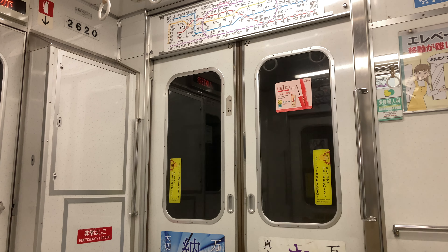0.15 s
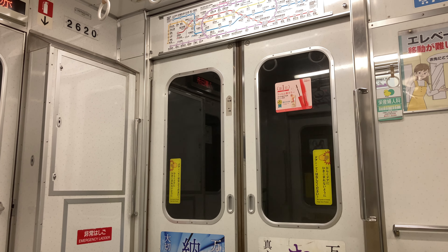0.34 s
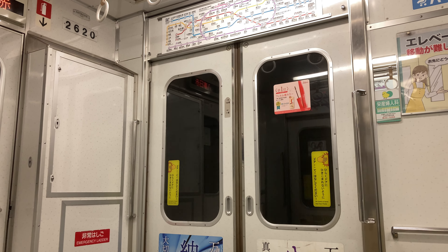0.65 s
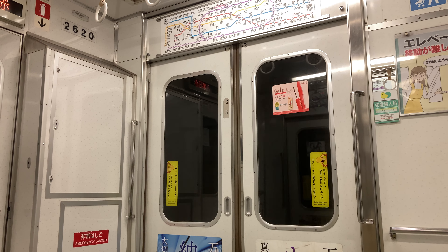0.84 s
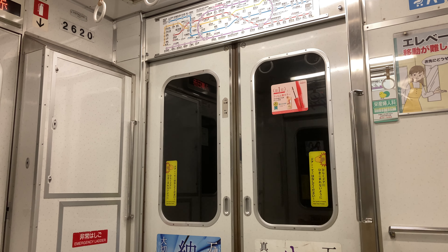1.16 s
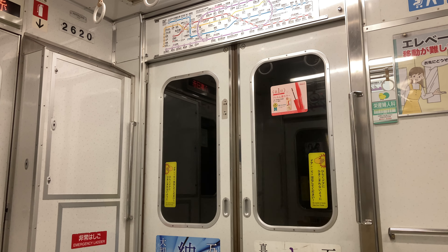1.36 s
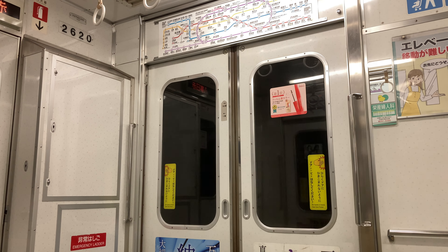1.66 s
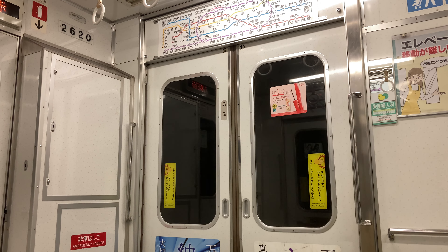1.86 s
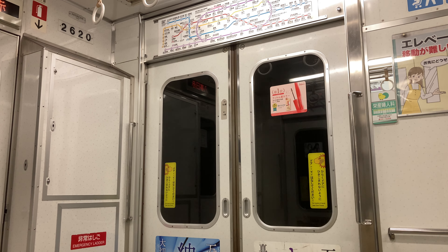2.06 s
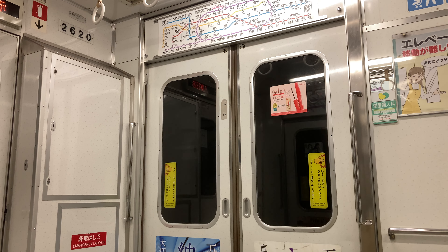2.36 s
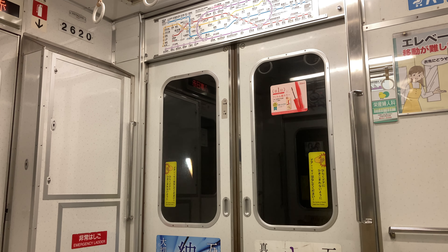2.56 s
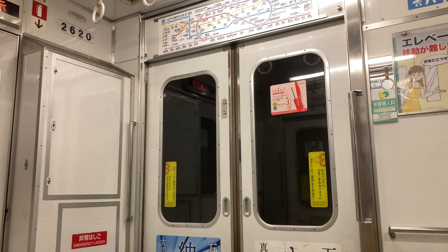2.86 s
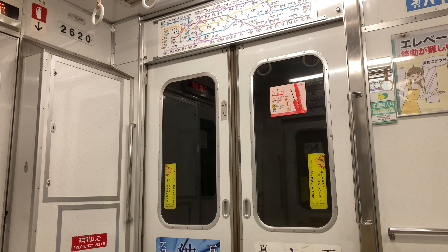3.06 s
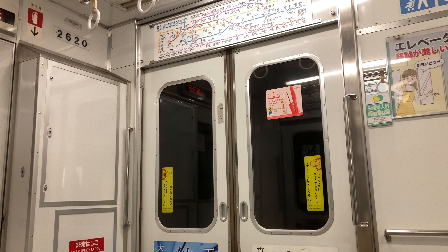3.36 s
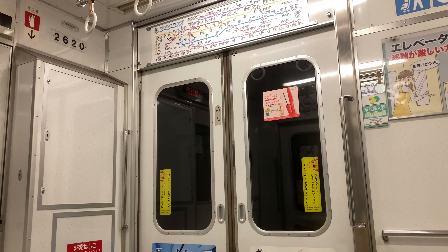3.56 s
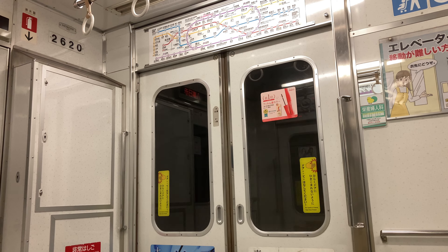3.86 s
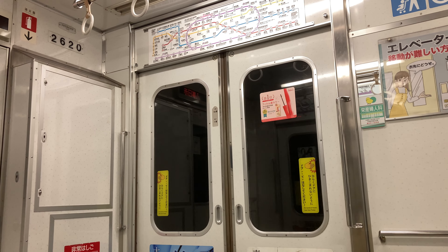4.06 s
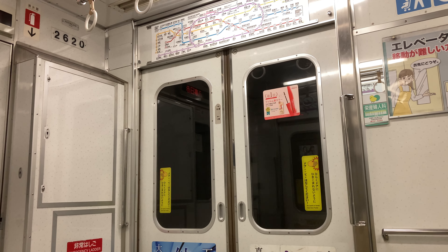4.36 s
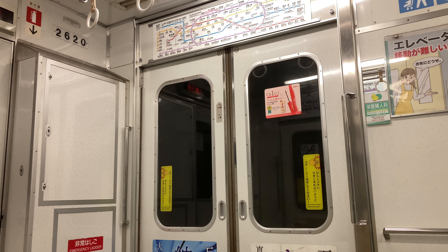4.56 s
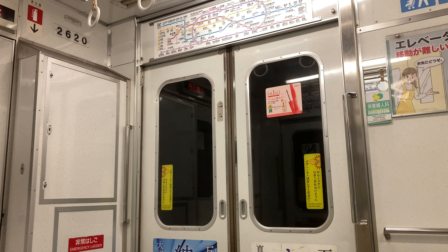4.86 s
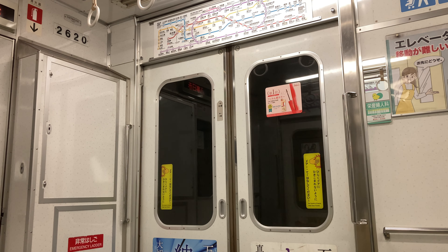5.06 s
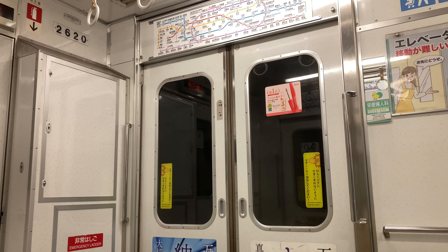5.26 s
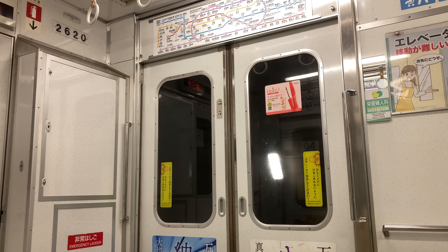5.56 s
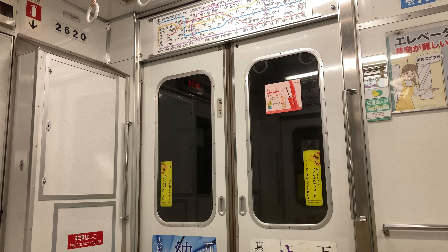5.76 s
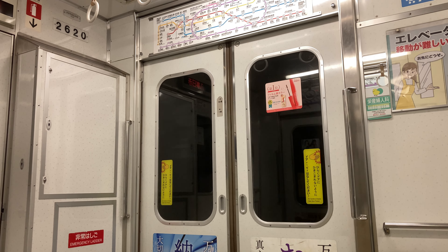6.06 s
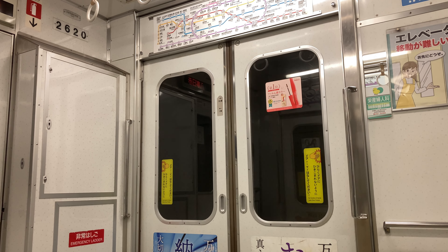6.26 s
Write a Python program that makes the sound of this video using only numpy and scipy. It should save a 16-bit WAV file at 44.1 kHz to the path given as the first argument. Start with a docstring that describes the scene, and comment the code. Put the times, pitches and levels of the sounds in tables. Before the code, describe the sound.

A subway train rolls through a tunnel, heard from a handheld microphone by the doors. A continuous low rumble fills the car, with faint ringing from the rails and a light rattle of panels. Clusters of dull thuds pass underfoot at rail joints. Very high, wavering wheel squeals sound on and off for the first four seconds or so. Later comes one small metallic clink, and the rumble grows slightly duller.

```python
"""Inside a metro car, rolling through a tunnel and slowing a little, heard from a handheld microphone pair.
All around, the wheels rumble through floor and doors; underfoot, axles thud over rail joints in pairs.
Flanges stick and slip on the rail and squeal very high, rail and wheel resonances sing, doors and panels
rattle, and a small metal part clinks once. Rumble and thuds reach the two microphone ports from all sides;
squeals and clink arrive straight from one spot."""
import sys
import numpy as np
from scipy import signal
from scipy.fft import rfft, irfft
from scipy.io import wavfile

SR = 44100
rng = np.random.default_rng(int(sys.argv[2]) if len(sys.argv) > 2 else 0)


def unload_wav(signal):
    """Save mono or channel-first audio to the path in sys.argv[1] as 16-bit WAV at rate SR, clipped to [-1, 1]."""
    wavfile.write(
        sys.argv[1],
        SR,
        np.round(np.clip(np.atleast_2d(signal).T, -1, 1) * 32767).astype(np.int16),
    )


N = 283122
TIME = np.arange(N) / SR
PROGRESS = TIME / TIME[-1] - .5   # -0.5 at the start, +0.5 at the end
HZ = np.maximum(np.arange(N // 2 + 1) * SR / N, 1)


# the ride, from inside the car: (time [s], rumble [dB], tunnel hiss [dB], roar lift [dB], singing lift [dB])
RIDE_LEVELS = [(0.0, -20.5, -59, 1.5, -4.5), (.6, -22.5, -66, 5, -0.7), (.9, -20.5, -64, 0, -3),
               (1.2, -21, -63, 0.5, -2), (1.6, -21, -64, 2, -0.5), (2.0, -21.5, -62, 1.4, 0.5),
               (2.8, -22, -60, 1, 1.3), (3.1, -21.5, -62, 0, 2), (3.45, -21, -61, 3.5, 3),
               (3.8, -19.5, -58, -2, 2), (4.3, -22, -59.5, -0.4, 3.5), (5.1, -22, -62.5, -0.2, 3.5),
               (5.5, -22, -59.5, 1, 4.5), (6.0, -20.5, -57.5, -0.5, 3.9), (6.42, -19.5, -64, 0.3, 3.5)]
# wheel rumble through floor and doors: (frequency [Hz], relative level [dB])
RUMBLE_SPECTRUM = [(13, -43), (22, -21), (70, -4.5), (119, -1), (197, 1), (270, -7), (437, -7.5),
                   (613, -17), (1090, -28.5), (2370, -29.5), (3920, -44), (4650, -40), (5770, -46.5),
                   (7000, -53.5), (9100, -77), (15400, -120)]
# resonances of the car body around the microphone: (frequency [Hz], width [Hz], lift [dB])
BODY_RESONANCES = [(38, 10, 2), (61, 6.3, 6.5), (83.2, 9, 10.5), (155.5, 35, 4), (208.7, 39.5, 4.5),
                   (238.7, 34.6, 4.5), (295.6, 5.5, 7.5), (321, 53, 2), (747, 9, 6), (1035, 350, 6),
                   (1420, 280, 4.5), (2012, 23, 6.5), (2160, 220, 3), (2730, 220, 3), (2980, 210, 4)]
# hiss from the tunnel outside: (frequency [Hz], relative level [dB])
HISS_SPECTRUM = [(4000, -30), (6500, -2), (7600, -1), (8700, -1), (9100, 2), (9600, -2), (11500, -4),
                 (13500, -6), (15700, -9)]
# effect of losing speed: (frequency [Hz], change from start to end [dB])
SLOWING_CHANGE = [(60, -2.5), (140, 3), (220, -3), (400, -4), (900, -5.5), (1600, -4.5), (2900, -18.5),
                  (5000, 0), (9000, -4.5), (13000, -13.5)]

def rolling():
    """Rough wheels on rail rumble through the car body and the tunnel hisses; duller as speed falls."""
    roar_hz, singing_hz = 420, 2600
    rumble_db, hiss_db, roar_db, singing_db = in_time(RIDE_LEVELS)
    body_db = sum(db / (1 + (2 * (HZ - hz) / width) ** 2) for hz, width, db in BODY_RESONANCES)
    slowing_db, common_drift = over_hz(SLOWING_CHANGE), drift(20)

    def band_db(hz):
        roar_lift_db = roar_db * np.exp(-2 * np.log2(hz / roar_hz) ** 2)
        singing_lift_db = singing_db * np.exp(-2 * np.log2(hz / singing_hz) ** 2)
        treble = 1 / (1 + (900 / hz) ** 4)
        waver_db = .15 * treble * common_drift + (1.4 + .61 * (1 - treble)) * drift(15.5)
        return roar_lift_db + singing_lift_db + PROGRESS * np.interp(hz, HZ, slowing_db) + waver_db

    rumble = in_bands(diffuse(over_hz(RUMBLE_SPECTRUM) + body_db),
                      lambda hz: rumble_db + band_db(hz), 30, 8000)
    hiss = in_bands(diffuse(over_hz(HISS_SPECTRUM)), lambda hz: hiss_db + band_db(hz), 3000, 22000)
    return rumble + hiss


# axles over rail joints, below the floor: (time [s], thud [dB], brightness [dB], thud t60 at 350 Hz [s],
# floor knock [dB], pitch the knock favours [Hz], door clatter [dB])
AXLE_BLOWS = [(0.17, -17.5, -17, 0.97, -26.5, 416, -70), (.305, -17.5, -5.5, 0.68, -22, 222, -45),
              (0.353, -34, 9.5, 0.45, -18, 318, -46), (0.424, -16.5, -25, 0.8, -20.5, 223, -52),
              (0.972, -12, -39, 0.91, -20.5, 194, -70), (1.032, -20.5, -18, 1, -48, 198, -60),
              (1.17, -28, 2, 0.59, -31, 274, -60), (2.181, -22, -3.5, 0.5, -19, 366, -55),
              (2.232, -21, -11, 0.96, -18, 200, -55), (2.335, -18, -7, 1, -17.5, 210, -50),
              (2.421, -25, -11, 0.63, -30.5, 335, -55), (3.105, -26, -1.5, 0.81, -19, 198, -60),
              (3.189, -38, 12, 0.96, -21.5, 223, -55), (4.522, -19.5, -13, 0.97, -17, 396, -58),
              (4.58, -32, -2, 0.44, -23.5, 421, -60), (4.69, -19.5, -7, 0.93, -18, 223, -52),
              (4.782, -36, -8, .45, -28, 418, -58), (5.53, -20, -17, 1, -29, 324, -65),
              (5.741, -23, -11, 0.54, -27, 423, -65)]
# the thud, arriving from all sides: (frequency [Hz], relative level [dB])
THUD_SPECTRUM = [(60, -31), (150, -26), (230, -8.5), (350, 2.5), (520, -7), (760, -4.5), (1100, -16.5),
                 (1450, -11.5), (2000, -21), (4200, -26), (5200, -30.5), (8000, -41.5), (14000, -50)]
# the floor ringing underfoot: (frequency [Hz], level [dB], t60 [s])
FLOOR_RING = [(198, -11, 0.79), (223, -8, 0.58), (274, -7.5, 0.23), (324.4, 2, 0.22), (366, -6, 0.45),
              (419.4, -8.5, 0.36), (478, -11, 0.25), (704, -11, 0.21)]
THUD_SWELL_S = .016

def rail_joints():
    """Axle blows knock the floor and thud in the tunnel, treble dying first; door fittings clank along."""
    coarse_time = TIME[::32]

    def thud_band_db(hz):
        power, treble = 1e-12, 1 / (1 + (900 / hz) ** 2)
        for s, thud_db, bright_db, t60, *_ in AXLE_BLOWS:
            age = np.maximum(coarse_time - s, 0)
            decay_db = -60 * age / (t60 * (350 / hz) ** .076)
            swell = 1 - np.exp(-age / THUD_SWELL_S)
            power = power + (amp(thud_db + treble * bright_db + decay_db) * swell) ** 2
        return np.interp(TIME, coarse_time, 10 * np.log10(power))

    blows = np.array(AXLE_BLOWS)
    knocks = struck(FLOOR_RING, blows[:, [0, 4]], spread_db=3, swell_s=.009, favoured_hz=blows[:, 5])
    thuds = in_bands(diffuse(over_hz(THUD_SPECTRUM)), thud_band_db, 60, 11000)
    return thuds + direct(knocks + door_clanks(), CAR_LEAD)


# a wheel leaning on the rail, one list for each squeal: (time [s], level [dB], pitch [Hz])
SQUEAL_GLIDES = [
    [(0.36, -66, 13000), (0.42, -46, 12800), (0.458, -58, 12700), (0.488, -46, 12700), (0.572, -46, 12600),
     (0.628, -60, 12300), (0.66, -43, 12100), (0.734, -56, 12100), (0.792, -60, 11900), (0.806, -47, 11900),
     (0.886, -47, 11440), (0.998, -48, 11900), (1.066, -34.5, 12460), (1.204, -54, 12700),
     (1.27, -68, 12800)],
    [(1.38, -62, 12800), (1.39, -67, 12600), (1.408, -44, 12600), (1.436, -48, 12600), (1.48, -39.5, 12250),
     (1.58, -49, 11850), (1.61, -44, 11600), (1.63, -46, 11400), (1.646, -40.5, 11500), (1.672, -47, 11500),
     (1.766, -45, 12000), (1.772, -38, 12060), (1.874, -43.5, 12660), (1.968, -59, 12800),
     (2.02, -65, 12800)],
    [(2.39, -63, 12300), (2.426, -50, 12300), (2.436, -41, 12300), (2.482, -50, 12100),
     (2.514, -41.5, 12000), (2.59, -46, 12250), (2.602, -37.5, 11960), (2.66, -43, 12100),
     (2.694, -51, 12400), (2.724, -44, 12400), (2.798, -64, 12300), (2.84, -69, 12000)],
    [(3.045, -70, 12400), (3.067, -65, 12600), (3.079, -48, 12500), (3.099, -44, 12300),
     (3.107, -56, 12100), (3.153, -40, 12000), (3.161, -49, 12000), (3.175, -37, 11800),
     (3.189, -51, 11900), (3.199, -44, 11900), (3.213, -57, 12000), (3.253, -49, 11400),
     (3.283, -56, 11300), (3.36, -66, 11300)],
]

def long_squeals():
    """Long stick-slip at the flange: a rough band of noise follows the gliding wheel resonance."""
    slip = slip_noise(width_hz=210, skirt_db=-17, count=2)
    out, fade_s = 0, .018
    for glide in SQUEAL_GLIDES:
        level_db, pitch_hz = in_time(glide)
        start_s, end_s = glide[0][0], glide[-1][0]
        fade = np.clip(np.minimum(TIME - start_s, end_s - TIME) / fade_s, 0, 1)
        out = out + fade * amp(level_db) * around_pitch(slip, pitch_hz)
    flutter_db = 1.1 * np.tanh(drift(45))
    return out * amp(flutter_db)


# brief grips of a flange on the rail: (time [s], hold [s], level [dB], first pitch [Hz], last pitch [Hz])
FLANGE_GRIPS = [(0, 0.081, -51, 12000, 12050), (.27, .02, -65, 14400, 14300),
                (.75, 0.025, -68, 14300, 14400), (1.13, .01, -50, 14050, 13900),
                (1.195, 0.039, -50, 15500, 15400), (1.33, 0.054, -53, 15200, 15400),
                (2.335, .01, -50, 9400, 9700), (2.75, 0.012, -49, 9700, 9400),
                (2.86, 0.0092, -51, 9550, 9600), (2.95, 0.027, -43.5, 9400, 9500),
                (3.07, 0.0087, -44.5, 9600, 9300), (3.168, 0.026, -45, 9500, 9400),
                (3.285, 0.031, -46, 9600, 9400), (3.39, 0.034, -44.5, 9400, 9350),
                (3.575, .04, -55, 13800, 13900), (3.685, 0.013, -59, 11600, 11600),
                (3.71, 0.11, -53, 14000, 14150), (3.83, .2, -52, 14200, 14300),
                (3.88, .2, -67, 15300, 15200), (3.995, 0.027, -54, 12900, 13100),
                (4.08, 0.078, -53, 14200, 14400)]

def short_squeals():
    """A flange grips, holds and lets go: a narrow band of noise round a gliding wheel resonance."""
    rise_s, fall_db_per_s, glide_on_s = .0205, 185, .045   # the pitch glides on after the hold
    out = np.zeros(N)
    slips = slip_noise(width_hz=220, skirt_db=-11, count=6).reshape(3, 2, N)
    flutter_db = 2 * drift(45)
    for k, (s, hold_s, level_db, first_hz, last_hz) in enumerate(FLANGE_GRIPS):
        now = (TIME >= s) & (TIME < s + hold_s + .4)
        age, release_s = TIME[now] - s, rise_s + hold_s
        fall_db = fall_db_per_s * np.maximum(age - release_s, 0)
        envelope = np.minimum(age / rise_s, 1) * amp(level_db - fall_db + flutter_db[now])
        pitch_hz = np.interp(age, [0, release_s + glide_on_s], [first_hz, last_hz])
        slip = slips[k % 3][:, now]   # neighbouring squeals get unrelated noise
        out[now] += envelope * around_pitch(slip, pitch_hz)
    return out


def slip_noise(width_hz, skirt_db, count):
    """Slow noises of uneven slipping, which spread a tone into a narrow band with a rough skirt."""
    white = rng.standard_normal((count, N))
    narrow = rms_one(signal.sosfilt(signal.butter(2, width_hz, fs=SR, output="sos"), white))
    skirt = rms_one(signal.sosfilt(signal.butter(2, 600, fs=SR, output="sos"), white))
    return rms_one(narrow + amp(skirt_db) * skirt[::-1])


def around_pitch(slip, pitch_hz):
    """Shift a pair of slow noises up into one band round a moving pitch."""
    phase = 2 * np.pi * np.cumsum(pitch_hz) / SR
    return slip[0] * np.cos(phase) + slip[1] * np.sin(phase)


# a touch and a faint bounce, at one spot in the car: (time [s], level [dB])
CLINK_TOUCHES = [(5.336, -36), (5.418, -51)]
# the small metal part: (frequency [Hz], level [dB], t60 [s])
METAL_RING = [(3556, -11, 1.9), (5334, -11, .5), (7369, 4.5, .2), (7410, -3, .15), (9700, 2, .14),
              (9730, 4, .17), (10250, -7, .13), (12280, -12, .18), (12900, -10, .04), (15150, -7, .2)]

def clink():
    """A small metal part is touched and rings, with a short bright puff; the ring wavers as it swings."""
    puff_db, puff_t60 = -11, .14   # level against the touch
    puff = sum((TIME > s) * amp(db + puff_db - 60 * np.abs(TIME - s) / puff_t60)
               for s, db in CLINK_TOUCHES)
    bright_noise = signal.sosfilt(signal.butter(4, 6500, "high", fs=SR, output="sos"), rng.standard_normal(N))
    metal = struck(METAL_RING, CLINK_TOUCHES, spread_db=1, swell_s=.012)
    return metal * amp(1.2 * drift(30)) + puff * bright_noise


# knocks at the doors: (time [s], level [dB], pitch the knock favours [Hz])
DOOR_KNOCKS = [(0.323, -44, 3300), (0.361, -41, 1950), (.387, -38, 1950), (2.255, -47, 2700),
               (2.348, -46, 1440), (2.375, -45, 5950), (3.2, -48, 1520), (3.3, -42, 1520)]
# the door fittings: (frequency [Hz], level [dB], t60 [s])
FITTING_RING = [(1430, -14, 0.28), (1520, -10, 0.33), (1880, -13, .2), (2000, -11, 0.22), (2700, -11, .25),
                (3300, -9, 0.15), (4350, -19, .2), (5950, -13, 0.23)]

def door_clanks():
    """Loose door fittings knock after a jolt and ring briefly."""
    knocks = np.array(DOOR_KNOCKS)
    return struck(FITTING_RING, knocks[:, :2], spread_db=7, swell_s=.0027, favoured_hz=knocks[:, 2])


# rail and wheels singing outside the car: (frequency [Hz], relative level [dB])
SINGING_SPECTRUM = [(500, -4), (900, -7), (1500, 0.5), (2100, -0.5), (2700, 0), (3300, -1), (4800, -21.5)]

def rail_singing():
    """Narrow rail and wheel resonances, rubbed by roughness, flare up one by one and fade as speed falls."""
    count, width_hz, against_rumble_db = 48, 72, -22
    rumble_db, _, _, singing_db = in_time(RIDE_LEVELS)
    roughness, out = irfft(diffuse(0 * HZ), N), 0
    colour_db, slowing_db = over_hz(SINGING_SPECTRUM), over_hz(SLOWING_CHANGE)
    for hz in np.geomspace(500, 4800, count) * rng.uniform(.99, 1.01, count):
        tone = rms_one(ring(roughness, hz, t60=np.log(1000) / (np.pi * width_hz)))
        level_db = np.interp(hz, HZ, colour_db) + PROGRESS * np.interp(hz, HZ, slowing_db)
        flare_db = 11 * np.tanh(drift(9.8) / 2)
        out = out + tone * amp(level_db + flare_db)
    return out * amp(against_rumble_db + rumble_db + singing_db) / np.sqrt(count)


def rattle():
    """Doors and panels tick in clumps all round the car, ever more softly; rail joints shake them harder."""
    ticks_per_s, clump_db, ring_cycles = 560, 1.2, 26
    pitches = np.geomspace(1300, 5200, 16)
    sizes = amp(1.5 * np.minimum(rng.exponential(1, (2, N)), 5)) * rng.choice([-1, 1], (2, N))
    ticks = sizes * (rng.random((2, N)) < ticks_per_s * amp(clump_db * drift(9)) / SR)
    pitch_index = rng.integers(0, len(pitches), (2, N))
    rings = sum(ring(ticks * (pitch_index == k), hz, ring_cycles / hz) * np.sqrt(2000 / hz)
                for k, hz in enumerate(pitches))
    midway_db, fall_db, clatter_t60 = -54, 23, .45
    power = amp(midway_db - fall_db * PROGRESS) ** 2
    for s, *_, clatter_db in AXLE_BLOWS:
        age = np.maximum(TIME - s, 0)
        swell = 1 - np.exp(-age / THUD_SWELL_S)
        power = power + (amp(clatter_db - 60 * age / clatter_t60) * swell) ** 2
    return np.sqrt(power) * rms_one(rings)


def struck(modes, blows, spread_db, swell_s, favoured_hz=None):
    """Each blow (time [s], level [dB]) strikes the modes unevenly; the ring swells as it fills the car."""
    favour_db, favour_octaves = 12, .09   # lift and reach round the pitch a blow favours
    out, onsets = np.zeros(N), [round(s * SR) for s, _ in blows]
    blow_db = np.array(blows)[:, 1]
    for hz, mode_db, t60 in modes:
        near = 0 if favoured_hz is None else np.exp(-(np.log2(hz / favoured_hz) / favour_octaves) ** 2)
        chance_db = spread_db * rng.standard_normal(len(onsets))
        clicks = np.zeros(N)
        clicks[onsets] = amp(blow_db + mode_db + favour_db * near + chance_db)
        out += ring(clicks, hz, t60) - ring(clicks, hz, swell_s * np.log(1000))
    return out


def ring(drive, hz, t60):
    """One resonance: a unit click sets off a decaying sine of height 1."""
    radius, angle = amp(-60 / (t60 * SR)), 2 * np.pi * hz / SR
    return signal.lfilter([0, np.sin(angle)], [1, -2 * radius * np.cos(angle), radius ** 2], drive + 1e-18)


# sound from all sides, at the two microphone ports: (frequency [Hz], left-right likeness [0-1])
PORT_LIKENESS = [(60, 0.75), (100, 1), (135, 0.74), (190, 0.85), (270, 0.57), (430, 0.65), (590, 0.04),
                 (920, 0.09), (1400, 0.29), (4200, 0.1), (5000, 0), (5800, 0.72), (6400, 0.6), (7200, 0.6),
                 (8500, 1)]
# sound of the car around the microphone: (frequency [Hz], phase by which left leads [rad])
CAR_LEAD = [(20, 0), (430, .2), (4220, 11.5), (4650, 12.3), (5500, 9.4), (6825, 2 * np.pi),
            (15925, -2 * np.pi)]

def diffuse(colour_db):
    """Spectra of coloured noise from all sides, partly shared by the two ports."""
    shared, left, right = rfft(rng.standard_normal((3, N)))
    alike = np.clip(over_hz(PORT_LIKENESS), 0, 1)
    common, own = np.sqrt(alike) * shared, np.sqrt(1 - alike)
    pair = ports(common + own * left, common + own * right, CAR_LEAD)
    return rms_one(pair * amp(colour_db)) * np.sqrt(N)


def direct(sound, lead_table):
    """One signal reaching both ports, faded out over the last 50 ms."""
    spectrum = rfft(sound * np.minimum((TIME[-1] - TIME) / .05, 1))
    return irfft(ports(spectrum, spectrum, lead_table), N)


# balance at the handheld microphone pair: (frequency [Hz], left minus right [dB])
PORT_BALANCE = [(60, -4.6), (110, -4), (200, -2), (380, -.5), (700, 1.2), (1290, 1), (2380, .4), (4400, -1),
                (8120, 0)]

def ports(left, right, lead_table):
    """Spectra at the two ports: the right one shifts in phase, and the balance leans with pitch."""
    lead = np.interp(HZ, *np.transpose(lead_table))
    lean = amp(over_hz(PORT_BALANCE) / 2)
    return np.array([left * lean, right * np.exp(-1j * lead) / lean])


def in_bands(spectra, gain_db, low_hz, high_hz):
    """Sum of overlapping half-octave bands, each following the curve gain_db(centre [Hz])."""
    out, centres = 0, 30 * 2 ** np.arange(0, 9.6, .5)
    for hz in centres[(centres >= low_hz) & (centres <= high_hz)]:
        share = np.clip(1 - 2 * np.abs(np.log2(np.maximum(HZ, 30) / hz)), 0, 1)
        out = out + amp(gain_db(hz)) * irfft(spectra * share, N)
    return out


def drift(rate_hz):
    """Random wander of rms 1, mostly slower than rate_hz."""
    step, settle = 40, 2000
    pole = np.exp(-2 * np.pi * rate_hz * step / SR)
    white = rng.standard_normal(N // step + settle + 2)
    slow = signal.lfilter([1], [1, -2 * pole, pole ** 2], white)[settle:]
    return np.interp(np.arange(N) / step, np.arange(len(slow)), rms_one(slow))


def in_time(rows):
    """Each column of a time table, sample by sample."""
    times, *columns = np.transpose(rows)
    return [np.interp(TIME, times, column) for column in columns]


def over_hz(rows):
    """A frequency table spread over HZ, on a log scale."""
    hz, values = np.transpose(rows)
    return np.interp(np.log(HZ), np.log(hz), values)


def amp(db):
    """Decibels to gain."""
    return 10 ** (np.asarray(db) / 20)


def rms_one(x):
    """Scale to rms 1."""
    return x / np.sqrt(np.mean(np.abs(x) ** 2) + 1e-20)


# sound straight from one spot to the microphone: (frequency [Hz], phase by which left leads [rad])
SPOT_LEAD = [(0, 5 * np.pi), (15925, -2 * np.pi)]

def scene():
    """The car all around the microphone, with squeals and clink from one spot."""
    car = rolling() + rail_singing() + rattle() + rail_joints()
    return car + direct(short_squeals() + long_squeals() + clink(), SPOT_LEAD)


def record(dry):
    """The handheld recorder cuts the top steeply, just under 16 kHz."""
    return signal.sosfilt(signal.cheby2(24, 60, 15950, fs=SR, output="sos"), dry)


dry = scene()
out = record(dry)
unload_wav(out)
```